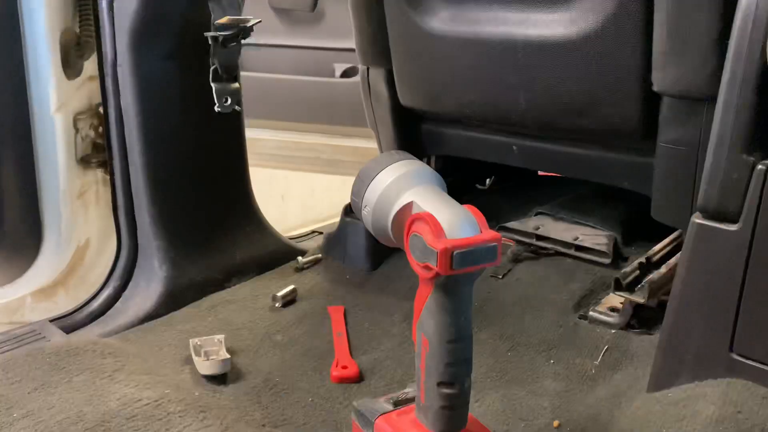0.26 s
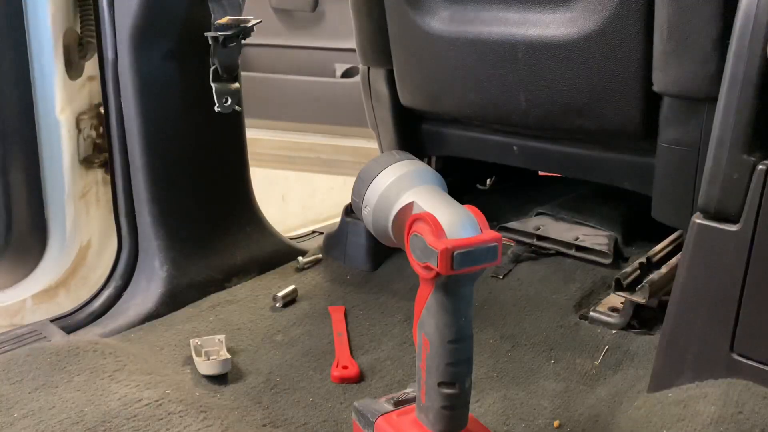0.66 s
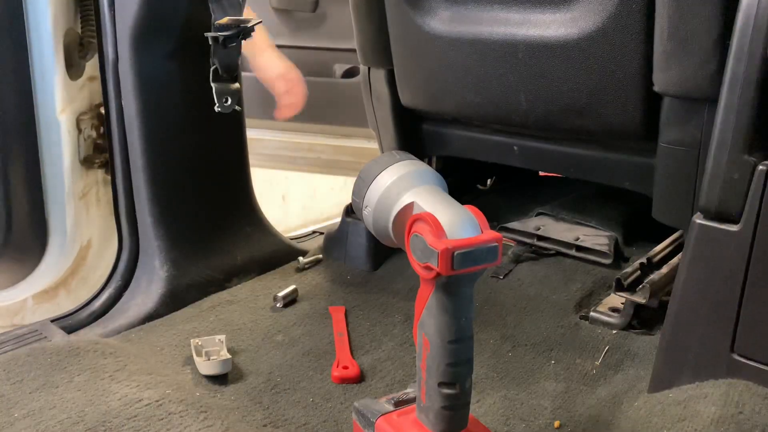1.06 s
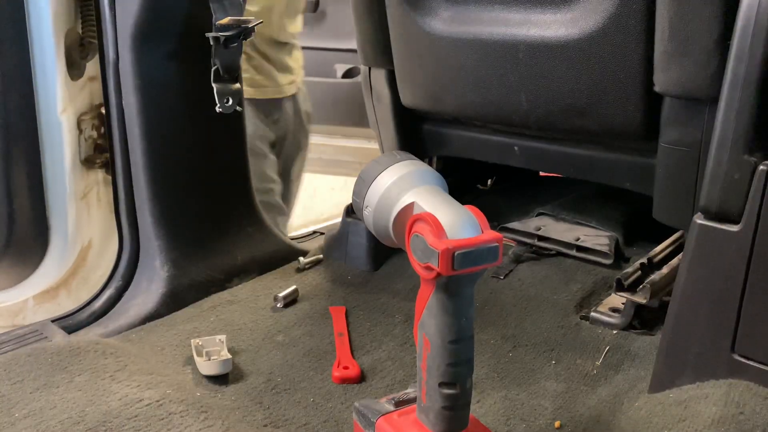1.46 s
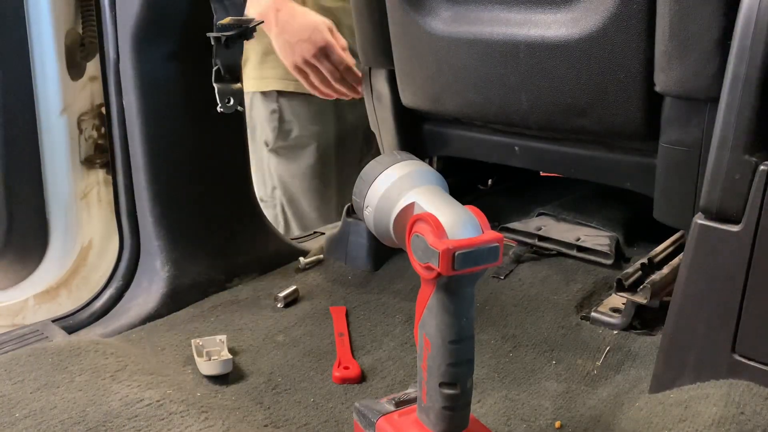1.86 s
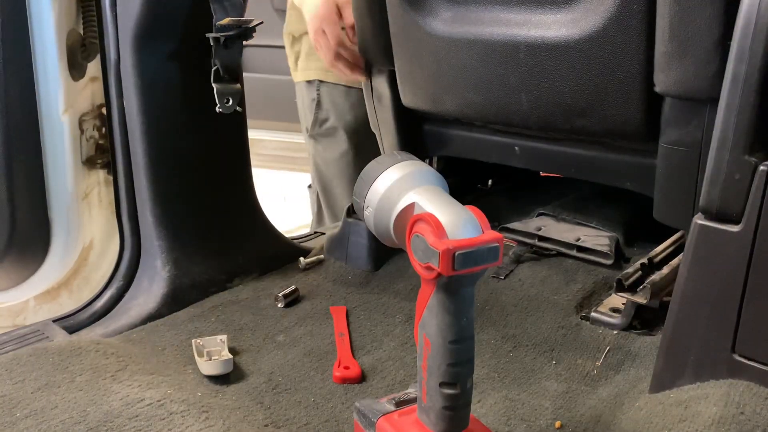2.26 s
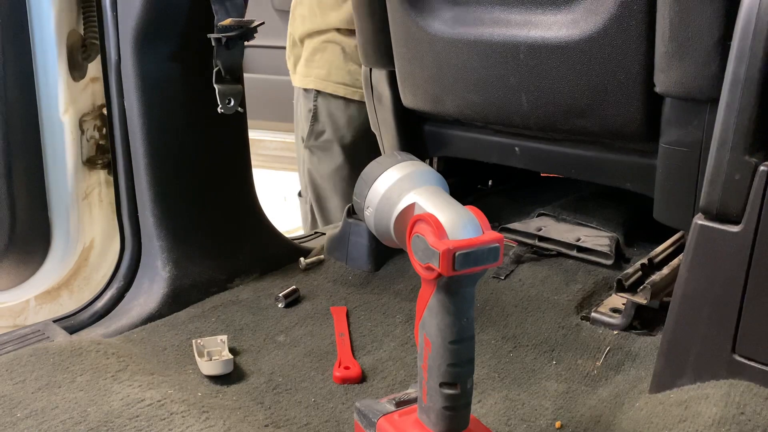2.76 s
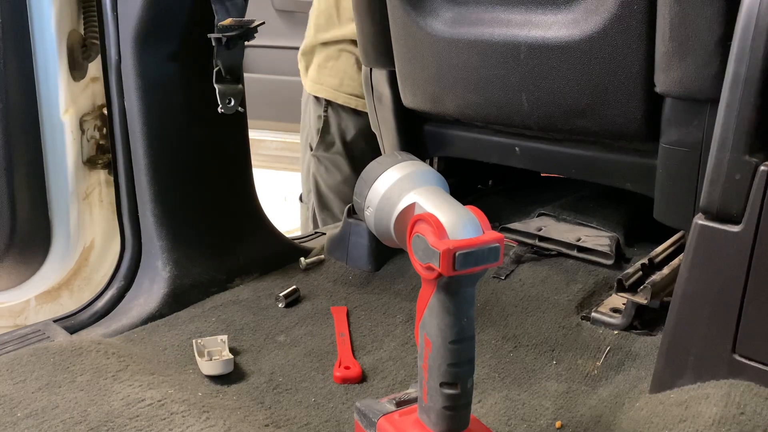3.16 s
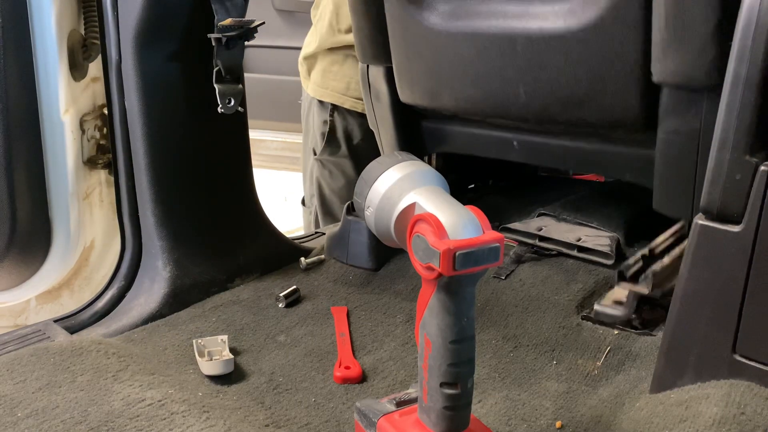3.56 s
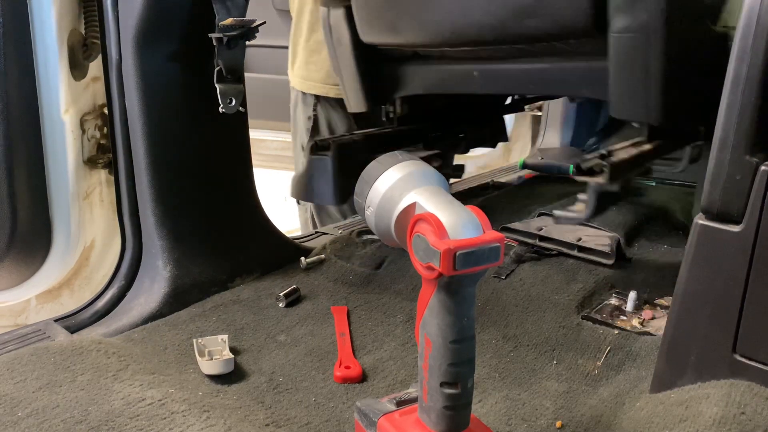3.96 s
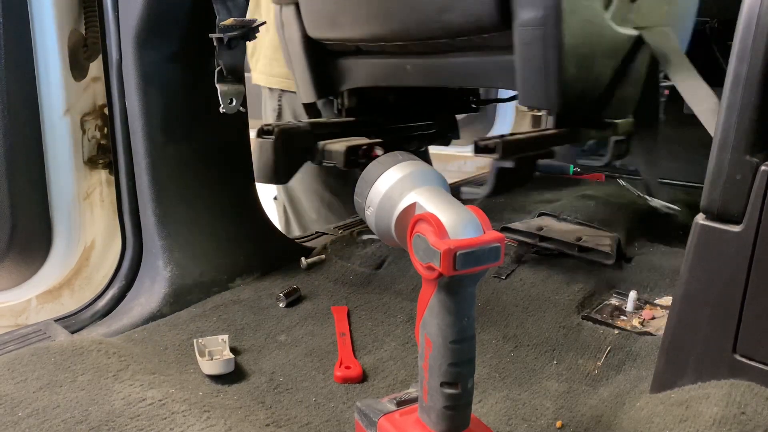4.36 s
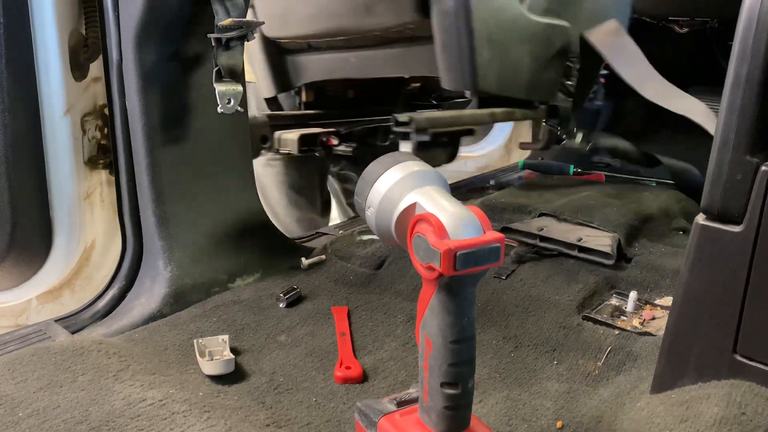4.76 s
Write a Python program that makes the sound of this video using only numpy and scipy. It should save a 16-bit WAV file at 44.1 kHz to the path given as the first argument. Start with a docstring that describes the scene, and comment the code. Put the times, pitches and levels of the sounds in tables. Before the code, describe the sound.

A quiet garage heard from the carpet of a vehicle cab, with faint air and a barely audible, wavering thin whine. A small dry click comes at 0.06 s, then soft shoe and cloth scuffs with muffled low bumps around 0.3 and 0.7 s. A faint sliding squeak and rub passes near 0.9 s; small ticks cluster around 1.5-1.6 s. At 1.77 s a hand knocks hollow plastic trim, followed by rustling and a lull. From about 3.1 s the seat is heaved loose: heavy booming thuds at 3.13 and 3.5 s, overlapping steel and plastic knocks, dull dragging and loose rattling until about 3.7 s. Lighter bumps and scuffs trail off. At 4.55 s a belt buckle strikes brightly and bounces, a short rising squeak follows at 4.65 s, and at 4.8 s it clacks onto trim and rail, ending in soft scuffing and a short garage tail.

```python
"""Pickup cab in a garage, heard from the carpet: someone walks up and heaves the front seat out.
Shoes, cloth and dragged weight scuff as shaped noise; the cab body booms as wandering and falling low modes.
Seat frame, rail and trim are struck and ring as fluttering modes over dense noise; squeaks are unsteady tones.
Near the end the belt buckle strikes and bounces, then lands on trim and rail.
Garage air and a faint whine lie beneath; a short garage tail answers the blows."""
import sys
import numpy as np
from scipy import signal
from scipy.fft import rfft, irfft
from scipy.io import wavfile
from scipy.ndimage import uniform_filter1d

SR = 44100
rng = np.random.default_rng(int(sys.argv[2]) if len(sys.argv) > 2 else 0)


def store_wav(level_fs):
    """Save 16-bit WAV to argv[1]."""
    pcm = np.round(np.clip(np.atleast_2d(level_fs), -1, 1) * 32767)
    wavfile.write(sys.argv[1], SR, pcm.T.astype(np.int16))


N = 221720
T = np.arange(N) / SR
LOOSE_FROM_S = 3.1  # frame off the floor, ringing freely


def amp(db):
    """Decibels to gain."""
    return 10 ** (np.asarray(db) / 20)


def unit(x):
    """Scale to rms 1."""
    return x / np.sqrt(np.mean(x ** 2))


def over_hz(table, hz):
    """Read a (f/Hz, value) table on a log-frequency axis."""
    f, v = np.transpose(table)
    return np.interp(np.log(np.maximum(hz, 1)), np.log(f), v)


def curves(table):
    """Columns of a (t/s, ..) table at every sample."""
    s, *columns = np.transpose(table)
    return [np.interp(T, s, c) for c in columns]


def colour(x, table):
    """Shape the spectrum by (f/Hz, level/dB) points."""
    hz = np.fft.rfftfreq(x.shape[-1], 1 / SR)
    return irfft(rfft(x) * amp(over_hz(table, hz)), x.shape[-1])


def band(x, lo_hz, hi_hz):
    """Band-pass."""
    sos = signal.butter(2, [lo_hz, min(hi_hz, .45 * SR)], "band", fs=SR, output="sos")
    return signal.sosfilt(sos, x)


def walk(rate_hz):
    """Smooth random wander, rms 1, shared by both channels."""
    k = int(SR / rate_hz)
    once = uniform_filter1d(rng.standard_normal(N), k)
    return unit(uniform_filter1d(once, k))


def add(out, s, sound):
    """Mix a sound in at time s."""
    i = int(s * SR)
    out[:, i:i + sound.shape[-1]] += sound[..., :N - i]


def strike(modes, tilt, contact_s, noise_db, noise_t60_s):
    """A blow rings the modes, weighted by its colour, over a ragged ring too dense to resolve."""
    t = np.arange(int(.4 * SR)) / SR
    hz, db, t60_s = np.transpose(modes)[:, :, None]
    # each port hears the modes in its own phases
    phase = 2 * np.pi * (hz * t + rng.random((2, len(hz), 1)))
    # loose parts keep touching: every mode flutters
    flutter = uniform_filter1d(rng.standard_normal((len(hz), len(t))), 150, axis=1)
    weight = amp(db + over_hz(tilt, hz)) * amp(3.5 * unit(flutter))
    ring = np.sum(weight * amp(-60 * t / t60_s) * np.sin(phase), axis=1)
    ring = ring / np.sqrt(len(hz) * np.mean(weight ** 2) / 2)
    ragged = amp(0.66 * unit(uniform_filter1d(rng.standard_normal(len(t)), 130)))
    noise = colour(rng.standard_normal((2, len(t))), tilt)
    dense = unit(noise * ragged) * amp(-60 * t / noise_t60_s)
    rise = 1 - np.exp(-t / max(contact_s, .0002))
    return rise * (ring + amp(noise_db) * dense) / np.sqrt(2 + 2 * amp(2 * noise_db))


# air spectrum: f/Hz, level/dB
AIR_COLOUR = [(53, -7), (90, 27), (156, 10), (971, -7), (1050, -31), (1390, -46), (1530, -57), (1710, -13),
              (8200, -20), (12000, -14.5), (16500, -25)]
# whine, sinking away and later returning: t/s, level/dB
WHINE_LEVEL = [(0, -79.5), (.3, -78), (1.45, -83), (1.7, -111), (5.03, -75)]
AIR_DB, WHINE_HZ = -66, 1522


def air():
    """Quiet garage air as coloured noise; a faint wavering whine as narrow-band noise."""
    hush = unit(colour(rng.standard_normal((2, N)), AIR_COLOUR))
    whine = unit(band(rng.standard_normal((2, N)), .985 * WHINE_HZ, 1.015 * WHINE_HZ))
    hush_gain = amp(AIR_DB + 1.0 * walk(4))
    whine_gain = amp(curves(WHINE_LEVEL)[0] + 2.5 * walk(3))
    return hush_gain * hush + whine_gain * whine


# rumble of the cab body: t/s, level/dB, centre f/Hz
CAB_RUMBLE = [(0, -67.5, 62.4), (.25, -57.5, 63.58), (.38, -34.5, 62.2), (.59, -52.5, 48.97),
              (.69, -40, 43.7), (.82, -59, 45.9), (1.32, -53.5, 55.84), (1.54, -46.5, 55.7),
              (1.72, -45, 44.2), (1.9, -46.5, 43.95), (2.3, -43.5, 39.9), (2.5, -44.5, 38.55),
              (2.65, -65, 53.9), (3.04, -56, 73.66), (3.15, -37.5, 77.5), (3.35, -43.5, 74.03),
              (3.5, -26.5, 78.55), (3.8, -45.5, 76.4), (4.12, -57.5, 54.35), (4.28, -49, 56.3),
              (4.47, -66, 58), (4.82, -53.5, 62.4), (4.88, -41, 64), (5.03, -58, 56.5)]
# weight dropped on the cab floor: t/s, level/dB, f/Hz, t60/s
FLOOR_BOOMS = [(0.315, -24, 62, 0.38), (0.367, -32.5, 61.6, 0.37), (0.67, -31, 42.1, 0.22),
               (1.776, -22.5, 83, 0.21), (2.213, -23, 42.1, 0.098), (2.955, -24.5, 85, 0.079),
               (3.131, -6.5, 83.3, 0.099), (3.14, -21, 44.6, 0.35), (3.26, -21, 118, 0.17),
               (3.4, -23.5, 64, 0.26), (3.498, -8.5, 78.6, 0.098), (3.578, -13.5, 46.6, 0.2),
               (3.833, -18.5, 79.1, 0.16), (4.856, -25.5, 87, 0.19)]


def cab_body():
    """Low panel and spring modes: a restless rumble, and slow swings after each drop of weight."""
    rumble_db, rumble_hz = curves(CAB_RUMBLE)
    # narrow noisy mode whose centre follows the load
    lowpass = signal.butter(2, 10.5, fs=SR, output="sos")
    spread = signal.sosfilt(lowpass, rng.standard_normal((2, N)))
    turn = 2 * np.pi * np.cumsum(rumble_hz) / SR
    rumble = unit(spread[0] * np.cos(turn) + spread[1] * np.sin(turn))
    out = amp(rumble_db) * rumble * np.ones((2, 1))
    t = np.arange(int(.6 * SR)) / SR
    for s, db, hz, t60_s in FLOOR_BOOMS:
        swell = 1 - np.exp(-t / 0.01)
        add(out, s, amp(db - 60 * t / t60_s) * swell * np.sin(2 * np.pi * hz * t))
    return out


# scuffs of soles and cloth, then seat drags: loudest t/s, rise/s, fall/s,
# hiss level/dB, dull drag level/dB, frame hum level/dB
SCUFF_SWELLS = [(.17, 0.21, .1, -70, -68, -71), (.304, 0.38, 0.29, -60.5, -55, -61.5),
                (.7, 0.15, 0.17, -63, -66, -85), (.83, 0.028, 0.31, -65, -59, -81),
                (0.944, 0.083, 0.2, -51, -70, -46.5), (1.11, 0.033, 0.2, -85, -68, -60.5),
                (1.41, 0.15, 0.28, -64, -62, -77), (1.532, 0.24, 0.19, -59, -52, -54.5),
                (1.838, 0.19, 0.21, -57.5, -47.5, -51), (2.12, 0.15, 0.25, -56, -58.5, -53),
                (2.5, 0.14, 0.16, -68, -77.5, -85), (2.82, 0.19, 0.29, -64.5, -72, -79),
                (3.25, 0.15, 0.21, -44.5, -37, -70), (3.44, 0.31, 0.23, -46, -38.5, -50.5),
                (3.593, 0.2, 0.21, -46.5, -30.5, -35.5), (3.85, 0.05, 0.068, -49, -63, -72),
                (3.934, 0.045, 0.37, -68.5, -53, -61.5), (4.214, 0.23, 0.45, -60, -60, -64.5),
                (4.56, 0.14, 0.36, -63, -56.5, -60), (4.697, 0.45, 0.21, -53.5, -59, -56),
                (5.0, 0.53, .2, -59, -55.5, -64)]
SCUFF_EDGE_DB = -20.5  # one rise before and one fall after the loudest moment
SCUFF_ROUND = 1.056  # 1 = pointed top, 2 = bell


def scuff_levels():
    """Hiss, drag and hum gains: every scuff swells to its loudest moment and dies away; powers add."""
    s, rise_s, fall_s, *layers_db = np.transpose(SCUFF_SWELLS)[:, :, None]
    before = (s - T) / np.maximum(rise_s, .01)
    after = (T - s) / np.maximum(fall_s, .01)
    away = np.where(T < s, before, after)
    power = amp(2 * SCUFF_EDGE_DB * away ** SCUFF_ROUND)
    return [np.sqrt(amp(2 * db[:, 0]) @ power + 1e-18) for db in layers_db]


# spectrum of rubbing fibres, main range and top: f/Hz, level/dB
RUB_COLOUR = [(200, -8), (500, -32.5), (562, -8), (952, -12.5), (1230, -13.5), (1520, -13), (4110, -17),
              (8200, -23)]
RUB_TOP = [(11000, -26), (14000, -26.5), (16500, -21)]
# seat frame modes, also struck by knocks and grit: f/Hz, level/dB, t60/s (blows rescale it)
FRAME_MODES = [(158.1, -6.5, 0.29), (191.9, -3.5, 0.25), (247.2, 0.5, 0.12), (375, -6, 0.21),
               (459.2, -4, 0.24), (627.2, -2.5, 0.14), (717.5, -5.5, 0.16), (766.4, -6, 0.052),
               (914.3, -10.5, 0.19), (1020, -13, 0.18), (1164, -15, 0.13), (1370, -16, 0.35),
               (1540, -44, 0.41), (2010, -29, 0.17), (2391, -16, 0.1), (2774, -16, 0.12)]


def rubbing():
    """Fibres slip in dense grains of uneven size; weight drags dully; the frame hums in its upper modes."""
    hiss_gain, drag_gain, hum_gain = scuff_levels()
    grain_db = 0.99 * rng.exponential(size=N) + 0.6 * walk(60)
    grains = rng.standard_normal((2, N)) * amp(grain_db)
    hiss = unit(colour(grains, RUB_COLOUR + RUB_TOP))
    slips = rng.standard_normal((2, N)) * amp(3.2 * walk(35))
    drag = unit(band(slips, 54, 454))
    free = np.where(T > LOOSE_FROM_S, 1, .25)
    hum = 0.58 * unit(band(slips, 323, 1690))
    for hz, db, t60_s in FRAME_MODES[5:]:
        width_hz = np.log(1000) / np.pi / t60_s
        hum = hum + free * amp(db) * unit(band(slips, hz - width_hz, hz + width_hz))
    return hiss_gain * hiss + drag_gain * drag + hum_gain * unit(hum)


# small hard parts: t/s, level/dB, brightest f/Hz, contact/s, rattle t60/s, rattle over ring/dB
RAIL_CLICKS = [(0.057, -30.5, 2800, 0.00066, 0.011, 4), (1.519, -50.5, 1500, 0.0021, 0.091, -13),
               (1.549, -53, 2410, 0.0024, 0.035, 12), (1.573, -36.5, 3540, 0.0024, 0.032, -14),
               (1.589, -43.5, 1480, 0.003, 0.05, -5), (1.603, -44.5, 3370, 0.0022, 0.037, -19),
               (2.84, -39, 4440, 0.0018, 0.1, 13), (3.12, -29.5, 2390, 0.00038, 0.2, -5),
               (3.238, -29.5, 2480, 0.0012, 0.081, 33), (3.578, -23.5, 3570, 0.00091, 0.046, -2.5),
               (3.621, -41, 2800, 0.0013, 0.015, -6), (3.649, -28.5, 2440, 0.00064, 0.044, -8.5),
               (3.681, -27, 2330, 0.00058, 0.017, -3.5), (3.925, -47, 2990, 0.0022, 0.036, -10),
               (4.061, -50, 2386, 0.00072, 0.034, 7)]
# rail modes: f/Hz, level/dB, t60/s (each click rescales it)
RAIL_MODES = [(666, 15.5, 0.19), (1428, 8.5, 0.094), (1960, 4.5, 0.058), (2456, 9, 0.042),
              (2920, 2.5, 0.072), (3390, -2, 0.063), (3904, -0.5, 0.063), (4490, -7, 0.062),
              (4850, -11, 0.14), (5700, -9.5, 0.034), (5960, -16, 0.036)]


def rail_clicks():
    """Rail parts tick and rattle; a longer rattle lets the modes ring longer."""
    out = np.zeros((2, N))
    for s, db, hz, contact_s, t60_s, rattle_db in RAIL_CLICKS:
        tilt = [(0.21 * hz, -30), (0.78 * hz, -7), (hz, 0), (1.27 * hz, -6), (14000, -13)]
        modes = [(f, mode_db, ring_s * t60_s / 0.047) for f, mode_db, ring_s in RAIL_MODES]
        add(out, s, amp(db) * strike(modes, tilt, contact_s, rattle_db, t60_s))
    return out


# blows on the seat frame: t/s, level/dB, strongest f/Hz, middle level/dB, treble level/dB, t60/s
FRAME_KNOCKS = [(.169, -40.5, 280, -24, -19.5, 0.049), (.27, -46, 560, -33, -33, 0.24),
                (.821, -43, 185.3, -18, -38, 0.071), (1.115, -47.5, 143.4, 25, -21, 0.16),
                (1.395, -39.5, 177, -22, -56, .15), (1.484, -33, 159, -29, -26, 0.056),
                (1.65, -47.5, 490, -30, -12, 0.087), (2.218, -48.5, 220.2, -37, -16, 0.16),
                (2.848, -42, 171, -28, -32, 0.15), (2.949, -37.5, 159, -47, -32, 0.092),
                (3.071, -32, 273.7, -45, -53, 0.11), (3.085, -25, 167, -38, -62, 0.19),
                (3.122, -15, 435, 5.5, -4.5, 0.07), (3.133, -11, 167, -22, -20, 0.091),
                (3.181, -20.5, 142.8, -10, -18, 0.051), (3.247, -14, 154.4, -20, -49, 0.037),
                (3.317, -19.5, 147, 3, -38, 0.046), (3.38, -30, 171, -2, -8, 0.05),
                (3.457, -18, 340, -8, -33, 0.082), (3.472, -11.5, 190, -22.5, -42, 0.13),
                (3.498, -10, 193.2, -21, -33, 0.068), (3.559, -19, 400.8, -6, -32, 0.056),
                (3.57, -11, 746, -11.5, -26, 0.11), (3.581, -11.5, 341, -29, -19.5, 0.12),
                (3.62, -17, 645, -3.5, -6.5, .11), (3.646, -20, 161, 8.5, 10, 0.077),
                (3.682, -28.5, 372.7, -1, 1, 0.055), (3.741, -46, 141.2, -3, 1, 0.069),
                (3.822, -36.5, 144, -1, -34, 0.044), (4.04, -47.5, 313, 9, -10, 0.1),
                (4.108, -46, 160.6, -2, -24, 0.044), (4.187, -43.5, 148.7, -41, -25, .092),
                (4.28, -48.5, 400, -6, -14, 0.051), (4.41, -48.5, 450, -3, -20, 0.065)]
CONTACT_CYCLES, CONTACT_LEAST_S = 0.45, 0.0028  # a lower blow presses longer
FRAME_FREE_T60_S = 0.13  # a blow this long lets the frame ring as listed


def knocks():
    """Blows on the steel and plastic seat frame, each with its own pitch and hardness."""
    out = np.zeros((2, N))
    for s, db, hz, middle_db, treble_db, t60_s in FRAME_KNOCKS:
        tilt = [(0.22 * hz, -24), (hz, 0), (1.23 * hz, -5),
                (1100, middle_db), (2600, treble_db), (9000, treble_db - 26.5)]
        # padding near the blow sets how long the frame rings
        damped = [(f, mode_db, ring_s * t60_s / FRAME_FREE_T60_S) for f, mode_db, ring_s in FRAME_MODES]
        contact_s = CONTACT_LEAST_S + CONTACT_CYCLES / hz
        add(out, s, amp(db) * strike(damped, tilt, contact_s, -2.5, t60_s))
    return out


# a sliding sole, later a strap: start t/s, rise/s, hold/s, level/dB, first f/Hz, last f/Hz
SLIDE_SQUEAKS = [(.9, 0.0208, 0.0816, -58, 470, 630), (4.624, 0.046, .018, -45.5, 618, 697)]
SQUEAK_FALL_S = 0.011


def squeak():
    """Stick-slip: an unsteady, fluttering, rising pitch with its octave."""
    out = 0
    for s, rise_s, hold_s, db, first_hz, last_hz in SLIDE_SQUEAKS:
        knots_s = s + np.cumsum([0, rise_s, hold_s, SQUEAK_FALL_S])
        hz = np.interp(T, knots_s[1:], [first_hz, last_hz, last_hz])
        turn = 2 * np.pi * np.cumsum(hz * (1 + .07 * walk(250))) / SR
        shape = np.interp(T, knots_s, [0, 1, 1, 0]) ** 2
        tone = np.sin(turn) + 0.3 * np.sin(2 * turn)
        out = out + shape * amp(db + 3.8 * walk(90)) * tone
    return out


# a hand, later the buckle, on plastic trim: t/s, level/dB, contact/s, treble level/dB, rattle t60/s
TRIM_HITS = [(1.769, -15, 0.0038, -25, 0.042), (1.775, -16.5, 0.0062, -17, 0.11),
             (4.801, -20.5, 0.0018, -35, 0.13)]
# trim modes: f/Hz, level/dB, t60/s
TRIM_MODES = [(257, 0, 0.074), (318, -6, 0.17), (382.4, 5.5, 0.06), (662, 0, 0.12), (771, -2.5, 0.073),
              (1186, -9.5, 0.11), (1280, -2.5, 0.066), (1644, 5, 0.096), (1730, -25, 0.091)]
TRIM_RATTLE_DB = -8  # over the ring


def trim():
    """Hollow plastic panel: a few low modes over a quick rattle."""
    out = np.zeros((2, N))
    for s, db, contact_s, treble_db, t60_s in TRIM_HITS:
        tilt = [(120, 3.0), (350, -5.5), (900, -5.5), (2500, treble_db), (8000, treble_db - 24.0)]
        add(out, s, amp(db) * strike(TRIM_MODES, tilt, contact_s, TRIM_RATTLE_DB, t60_s))
    return out


GRIT_TICKS, DRAG_S = 55, .68  # loose parts rattle for DRAG_S


def grit():
    """Loose parts of the dragged frame rattle: scattered small ticks into its modes, a few large."""
    hum_gain = scuff_levels()[2]
    out = np.zeros((2, N))
    damped = [(f, db, 0.23 * t60_s) for f, db, t60_s in FRAME_MODES]
    for when, size, pitch in rng.random((GRIT_TICKS, 3)):
        s = LOOSE_FROM_S + DRAG_S * when
        tilt = [(300, -20), (700 * 4 ** pitch, 0), (8000, -18)]
        gain = hum_gain[int(s * SR)] * amp(-2 - 3.0 * np.log(size + .05))
        add(out, s, gain * strike(damped, tilt, 0.00098, 0, 0.013))
    return out


# rail jarred: t/s, level/dB
PIN_HITS = [(3.13, -41), (3.237, -44)]
PIN_HZ, PIN_T60_S = 12378, 0.43


def pin():
    """A small steel pin sings one decaying sine when the rail is jarred."""
    out = np.zeros((2, N))
    for s, db in PIN_HITS:
        add(out, s, amp(db - 60 * T / PIN_T60_S) * np.sin(2 * np.pi * PIN_HZ * T))
    return out


# colour of metal on metal, buckle and tongue alike: f/Hz, level/dB
METAL_CRACK = [(600, -11.5), (2500, -0.5), (7000, -1.5), (12000, -7), (16000, 4)]
# buckle strikes and bounces: t/s, level/dB, contact/s, rattle t60/s
BUCKLE_HITS = [(4.5485, -16.5, 0.00066, 0.06), (4.5527, -19, 0.0012, 0.088), (4.581, -23, 0.00054, 0.071),
               (4.5958, -28, 0.00081, 0.085)]
# buckle modes: f/Hz, level/dB, t60/s
BUCKLE_MODES = [(2253, -17.5, 0.16), (2610, -12, 0.098), (3080, -18.5, 0.18), (4250, -20, 0.1),
                (4770, -22.5, 0.12), (7061, -8.5, 0.11), (6340, -5.5, 0.061), (7500, -8.5, 0.062),
                (8320, -9, 0.12), (9900, -13, 0.099), (13970, -21, .09)]


def buckle():
    """Belt buckle on metal: high modes under a stronger rattle."""
    out = np.zeros((2, N))
    for s, db, contact_s, t60_s in BUCKLE_HITS:
        add(out, s, amp(db) * strike(BUCKLE_MODES, METAL_CRACK, contact_s, 5.4, t60_s))
    return out


# buckle's steel tongue lands on the rail: t/s, level/dB, contact/s, rattle t60/s
TONGUE_HITS = [(4.8015, -25.5, 0.00089, 0.018), (4.8034, -19.5, 0.0012, 0.099)]
# tongue modes: f/Hz, level/dB, t60/s
TONGUE_MODES = [(2390, -16, 0.089), (2540, -7.5, 0.064), (2690, -12.5, 0.057), (4820, -43, 0.056),
                (5400, -9.5, 0.081), (6900, -18, 0.078), (7080, -4, 0.085), (7700, -5, 0.083),
                (10000, -9.5, 0.14), (11840, 1.5, 0.13)]


def tongue():
    """Steel tongue on the rail: high modes and rattle about equally strong."""
    out = np.zeros((2, N))
    for s, db, contact_s, t60_s in TONGUE_HITS:
        add(out, s, amp(db) * strike(TONGUE_MODES, METAL_CRACK, contact_s, 0.33, t60_s))
    return out


# garage decay: f/Hz, t60/s
GARAGE_DECAY = [(150, 0.3), (600, 0.27), (2500, 0.39), (7000, 0.26), (14000, 0.25)]
GARAGE_DB = -11.5


def garage(x):
    """Diffuse tail: octave bands of noise, each with its own decay, building up over milliseconds."""
    t = np.arange(int(.8 * SR)) / SR
    tail = 0
    for hz in 90 * 2 ** np.arange(8):
        octave = band(rng.standard_normal((2, len(t))), hz / np.sqrt(2), hz * np.sqrt(2))
        tail = tail + octave * amp(-60 * t / over_hz(GARAGE_DECAY, hz))
    tail *= 1 - np.exp(-t / 0.0011)
    return signal.fftconvolve(x, tail / np.sqrt(np.sum(tail[0] ** 2)), axes=1)[:, :N]


def scene():
    """All sources, and the garage answering the blows."""
    blows = rail_clicks() + knocks() + trim() + grit() + pin() + buckle() + tongue()
    steady = air() + cab_body() + rubbing() + squeak()
    return steady + blows + amp(GARAGE_DB) * garage(blows)


# treble response of the ports: f/Hz, level/dB
MIC_TOP = [(11000, 2), (13500, -3.5), (15000, -16.5), (16200, -27)]
# left-right likeness: f/Hz, correlation/1
PORT_LIKENESS = [(60, 0.95), (200, 0.91), (400, 0.47), (900, 0.059), (5400, 0.24), (6500, 1)]
# left minus right: f/Hz, level/dB
LEFT_LIFT = [(60, 0), (300, -0.5), (1000, 1), (4500, 2.5), (6300, 0)]
PORT_LAG_S, LAG_FROM_HZ, TOP_HZ = .000238, 7000, 16200


def record(dry):
    """Two ports: alike in the bass, nearly unrelated in the middle, offset in time in the treble; top cut."""
    hz = np.fft.rfftfreq(N, 1 / SR)
    left, right = rfft(dry) * amp(over_hz(MIC_TOP, hz))
    like = np.clip(over_hz(PORT_LIKENESS, hz), 0, 1)
    # the left port lags the right
    lag = np.exp(2j * np.pi * np.maximum(hz - LAG_FROM_HZ, 0) * PORT_LAG_S)
    lift = amp(over_hz(LEFT_LIFT, hz) / 2)
    mixed_right = like * lag * left + np.sqrt(1 - like ** 2) * right
    ports = irfft(np.array([left * lift, mixed_right / lift]), N)
    return signal.sosfilt(signal.ellip(8, .2, 70, TOP_HZ, fs=SR, output="sos"), ports)


dry = scene()
out = record(dry)
store_wav(out)
```